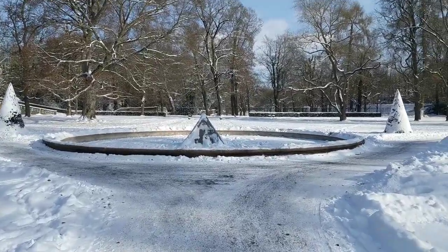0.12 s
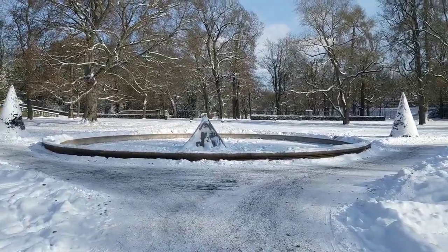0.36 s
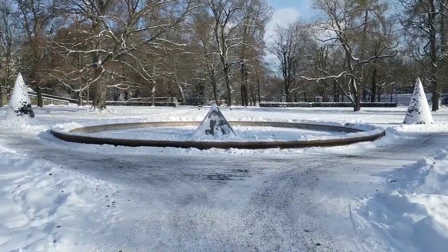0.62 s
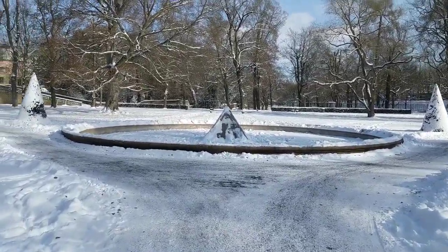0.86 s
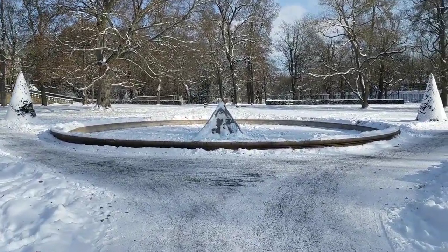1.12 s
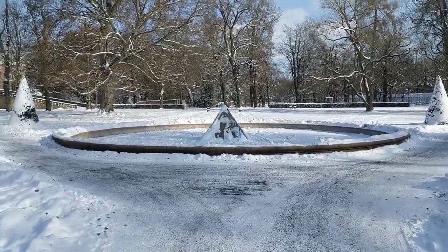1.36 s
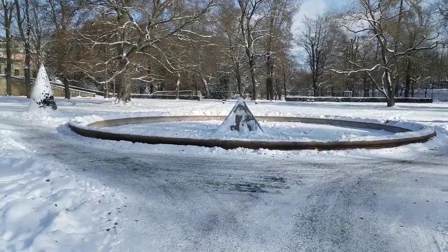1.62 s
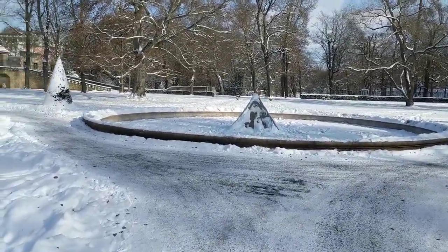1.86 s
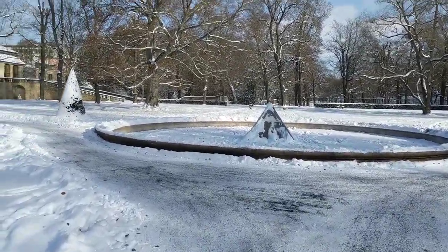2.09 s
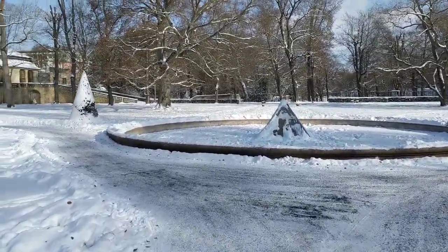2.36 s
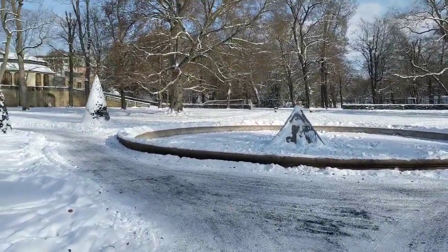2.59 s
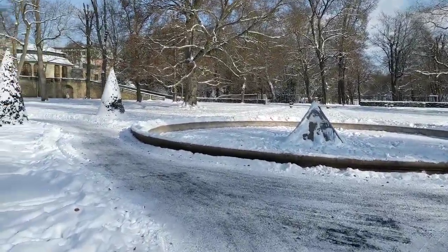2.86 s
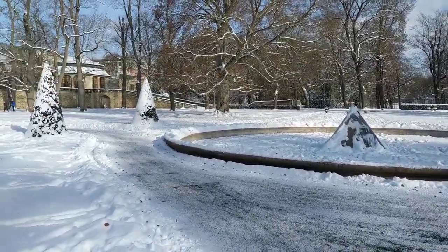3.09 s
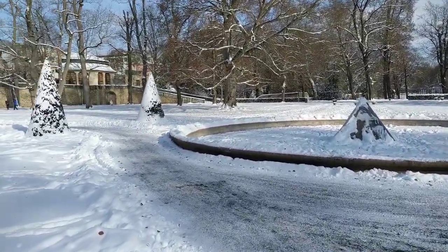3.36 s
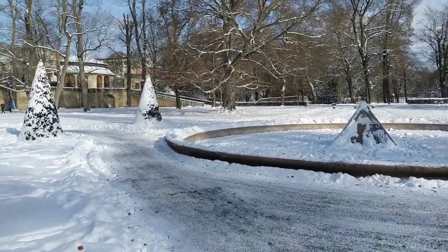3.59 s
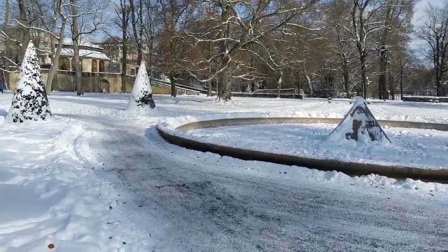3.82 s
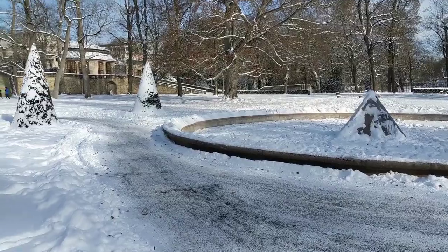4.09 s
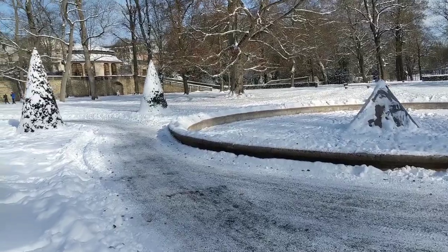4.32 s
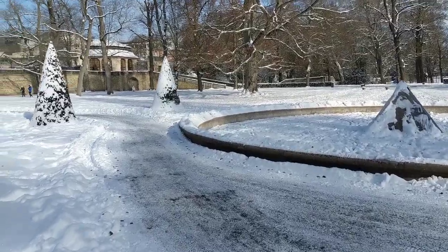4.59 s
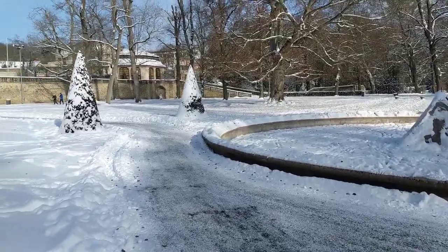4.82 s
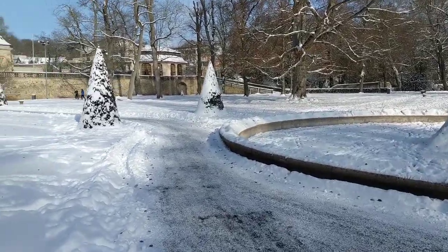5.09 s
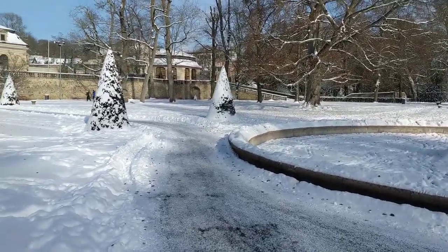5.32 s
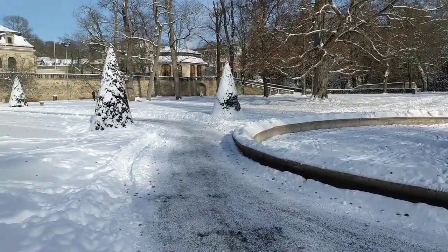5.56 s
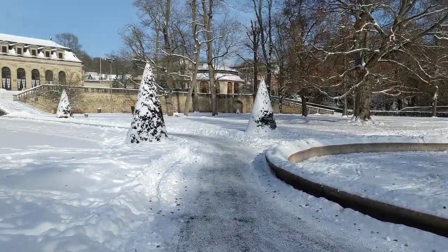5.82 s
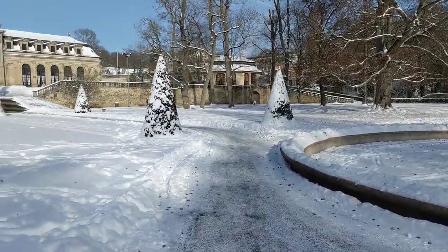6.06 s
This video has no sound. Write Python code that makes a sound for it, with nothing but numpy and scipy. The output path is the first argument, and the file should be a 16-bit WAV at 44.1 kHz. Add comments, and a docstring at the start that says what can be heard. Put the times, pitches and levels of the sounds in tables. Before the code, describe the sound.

Someone walks a snowy park path, each step a gritty crust break and duller packing crunch, while soft wind rumble comes and goes.

```python
"""Boots crunch along a trodden snow path, about two steps a second, heard from a hand-held camera.
Each heel breaks the crust with bright grit, then the weight packs the snow with a duller crunch: both are
thousands of short damped swings under step-shaped gains, with single clear cracks on top. Jacket cloth swishes
as patchy noise, wind buffets the microphone with low noise and puffs, and a far outdoor hiss lies underneath.
Soft low knocks, a metal chink and a faint whistle are the small details."""
import sys
import numpy as np
from scipy import signal
from scipy.fft import rfft, irfft, next_fast_len
from scipy.io import wavfile
from scipy.ndimage import uniform_filter1d, map_coordinates

SR = 44100
rng = np.random.default_rng(int(sys.argv[2]) if len(sys.argv) > 2 else 0)


def voltage_ratio(decibels):
    """Convert decibels (scalar or array-like) to amplitude ratios, 20 dB per decade."""
    exponent = np.asarray(decibels, float) / 20
    return 10 ** exponent


def generate_wav(sig):
    """Save sig (samples, or channels by samples) to the path in sys.argv[1] as 16-bit PCM at SR."""
    pcm = np.round(np.clip(np.atleast_2d(sig).T, -1, 1) * 32767).astype(np.int16)
    wavfile.write(sys.argv[1], SR, pcm)


N = 272979

# a heel breaks the crust: t/s, level/dB, hold/s
HEEL_STRIKES = [(0.0, -50, 0.0041), (0.395, -46.5, .02), (0.901, -49, 0.027), (1.421, -48.5, 0.027),
                (1.998, -52.5, 0.05), (2.529, -49, 0.05), (3.048, -52.5, 0.041), (3.605, -56.5, 0.018),
                (4.163, -58.5, 0.098), (4.72, -50, 0.025), (5.263, -58.5, .03), (5.797, -43.5, 0.026)]


def unit(x):
    """Scale to rms 1."""
    return x / np.sqrt(np.mean(x ** 2) + 1e-20)


def wobble(rate):
    """A smooth random curve with rate knots a second (at most 129)."""
    knots = rng.standard_normal(int(N * 130 / SR) + 4)
    return map_coordinates(knots, [np.arange(N) * min(rate, 129) / SR])


def coloured(x, spectrum):
    """Filter x by a response given as f/Hz, level/dB points joined on a log frequency axis."""
    size = next_fast_len(N + 8192)
    hz, db = np.transpose(spectrum)
    log_hz = np.log(np.fft.rfftfreq(size, 1 / SR) + 1)
    gain = voltage_ratio(np.interp(log_hz, np.log(hz), db))
    return irfft(rfft(x, size) * gain, size)[:N]


def rush(spectrum, patchy_db):
    """Coloured noise of rms 1 with patches of random gain in time and frequency."""
    z = signal.stft(rng.standard_normal(N), nperseg=512)[2]
    field = uniform_filter1d(rng.standard_normal(z.shape), size=6, axis=0)
    field = uniform_filter1d(field, size=8, axis=1)
    patchy = signal.istft(z * voltage_ratio(patchy_db * unit(field)), nperseg=512)[1][:N]
    return unit(coloured(patchy, spectrum))


def blips(s, gain, hz, cycles, turn, size, rise=0.24, fall=2.36):
    """Short damped swings around times s: a quick rounded rise, then an exponential fall."""
    k = np.arange(size) - size // 3
    phase = k / SR * hz[:, None]
    u = phase / np.maximum(cycles, .25)[:, None]  # time in units of the swing's length
    attack = np.exp(-(u / rise) ** 2)
    decay = np.exp(-fall * (np.hypot(u, 1 / 5) - 1 / 5))
    shape = np.where(u < 0, attack, decay)
    wave = -gain[:, None] * shape * np.cos(2 * np.pi * phase + turn[:, None])
    wave -= shape * (wave.sum(1) / shape.sum(1))[:, None]  # no lasting pressure change
    at = np.clip(np.round(s * SR).astype(int)[:, None] + k, 0, N)
    return np.bincount(at.ravel(), wave.ravel(), N + 1)[:N]


def grains(count, hz, spread, cycles, scatter_db, top_db, size):
    """Many swings at random moments, rms 1: log-normal pitch, a few larger than the rest up to top_db."""
    chance = rng.random((count, 3))
    pitch = np.clip(hz * np.exp(spread * rng.standard_normal(count)), 250, 15000)
    size_db = np.minimum(-scatter_db * np.log(chance[:, 1] + 1e-9), top_db)
    s = chance[:, 0] * N / SR
    turn = 2 * np.pi * chance[:, 2]
    return unit(blips(s, voltage_ratio(size_db), pitch, np.full(count, cycles), turn, size))


def swells(s, hold_s, db, rise, fall):
    """Gain of overlapping gestures: each rises to db at s, holds and dies, rise and fall in dB a second."""
    t = np.arange(0, N + 64, 64) / SR - np.asarray(s)[:, None]
    before = np.maximum(-t, 0)
    after = np.maximum(t - np.abs(hold_s)[:, None], 0)
    level_db = np.asarray(db)[:, None] - rise * before - fall * after
    gain = np.sqrt(np.sum(voltage_ratio(level_db) ** 2, axis=0))  # powers add
    return np.interp(np.arange(N) / 64, np.arange(t.shape[1]), gain)


def crust_gain():
    """A sharp burst under each heel, a trickle of grit after it, and soft scuffs as the boot swings."""
    # the swinging boot brushes the snow: t/s, level/dB
    scuffs = [(.17, -53.5), (.59, -52.5), (.985, -61.5), (1.117, -54), (1.73, -55.5), (2.327, -51.5),
              (2.66, -56), (2.78, -59), (3.41, -53.5), (3.54, -54), (3.86, -57), (4.1, -54.5), (4.5, -56),
              (4.64, -52.5), (4.95, -57.5), (5.44, -59), (6.06, -60)]
    heel_rise = 750  # dB per s
    s, db, hold_s = np.transpose(HEEL_STRIKES)
    burst = swells(s, hold_s, db, heel_rise, fall=340)
    trickle = swells(s, hold_s, db - 9, heel_rise, fall=59)
    s, db = np.transpose(scuffs)
    return burst + trickle + swells(s, 0 * s, db, rise=70, fall=45)


def packing_gains():
    """The load swells, holds and eases; a quieter roll goes on until the boot lifts."""
    # weight on the boot, then its roll: t/s, load level/dB, load hold/s, roll hold/s, roll level/dB
    weight = [(0.0, -46.5, 0.044, 0.22, -60), (0.405, -47, 0.12, .32, -54.5),
              (0.967, -42.5, 0.069, 0.29, -53.5), (1.437, -48, 0.1, 0.5, -57), (2.013, -51, 0.1, 0.37, -53),
              (2.592, -43.5, 0.021, .21, -55.5), (3.083, -53, 0.19, 0.28, -55),
              (3.64, -53, 0.076, 0.28, -52), (4.204, -42, 0.042, 0.28, -57), (4.735, -45, 0.082, .26, -56),
              (5.3, -52, 0.077, 0.2, -57), (5.835, -44.5, 0.037, 0.12, -59)]
    load_rise = 170  # dB per s
    s, db, hold_s, roll_s, roll_db = np.transpose(weight)
    load = swells(s, hold_s, db, load_rise, fall=307)
    roll = swells(s, roll_s, roll_db, load_rise, fall=330)
    return load, roll


def crunch():
    """Packing gives dense dull grains, the roll sparser snaps, the crust fine bright ones; crumbs tick along."""
    pack = grains(count=6500, hz=1250, spread=.33, cycles=1.2, scatter_db=4.6, top_db=13, size=320)
    snaps = grains(count=2200, hz=1300, spread=.36, cycles=1.3, scatter_db=5.0, top_db=15, size=320)
    crust = grains(count=9000, hz=3460, spread=0.46, cycles=0.97, scatter_db=2.5, top_db=3.5, size=96)
    crumbs = grains(count=520, hz=1870, spread=0.19, cycles=0.96, scatter_db=2.0, top_db=15.5, size=256)
    small_cracks = grains(count=170, hz=1500, spread=0.61, cycles=0.9, scatter_db=1.0, top_db=4.5, size=512)
    load, roll = packing_gains()
    clumps_db = 1.8 * wobble(95)
    uneven_db = 0.98 * wobble(17)
    steps = voltage_ratio(clumps_db + uneven_db) * (load * pack + roll * snaps + crust_gain() * crust)
    return steps + voltage_ratio(-62.5) * crumbs + voltage_ratio(-61.5) * small_cracks


def cracks():
    """Each crack is a dull swing with a bright splinter a moment before or after it."""
    # single clear cracks: t/s, body level/dB, f/Hz, length/cycles, splinter level/dB
    breaks = [(0.022, -23, 1210, .44, -39), (.061, -26, 1750, 1.4, -29), (0.1736, -24.5, 784, 0.53, -33),
              (.4118, -35, 990, 0.66, -21), (.4842, -26, 1350, .88, -36), (.554, -26, 1010, 0.69, -30),
              (0.6673, -24, 1650, 0.83, -46), (0.889, -27.5, 616, 0.65, -32), (0.935, -23, 1060, 0.62, -37),
              (0.9699, -29, 1100, 2.2, -32), (1.1273, -25, 1180, 0.46, -44), (1.253, -32.5, 1630, .89, -30),
              (1.2883, -16, 1260, 0.25, -34), (1.3333, -27, 1590, 0.73, -34), (1.3809, -40, 1230, .6, -32),
              (1.4261, -22.5, 770, 0.63, -40), (1.5976, -31, 1500, 1.9, -50),
              (1.6239, -32.5, 1700, 1.6, -55), (1.6434, -34, 1300, 1.2, -53), (1.697, -32, 1760, 1.5, -44),
              (1.9112, -31.5, 780, .65, -40), (1.968, -31, 560, 0.73, -53), (2.0195, -26.5, 666, 0.68, -36),
              (2.0754, -7, 1420, 1.13, -17.5), (2.1379, -27, 1610, 0.96, -45),
              (2.2184, -28, 1160, 0.66, -47), (2.308, -28, 1410, .74, -32), (2.337, -32, 2010, 1.8, -41),
              (2.389, -36, 1460, .65, -33), (2.566, -33, 1210, 0.53, -19), (2.798, -32, 1340, 0.78, -45),
              (3.0346, -30, 1650, 1.6, -32), (3.4296, -30, 1690, 1.4, -39), (3.607, -30, 750, 0.86, -37),
              (3.8439, -25, 1260, 0.61, -46), (3.8644, -17.5, 1010, 0.47, -49),
              (3.8771, -31, 840, .82, -47), (3.913, -18, 1040, 0.62, -51), (4.0238, -31, 630, 1.9, -70),
              (4.0682, -33, 557, 0.93, -51), (4.2368, -29, 900, 1.8, -54), (4.3622, -25.5, 960, .43, -42),
              (4.4186, -34, 1340, 1.0, -52), (4.43, -32.5, 1680, 1.8, -53), (4.6905, -28.5, 780, 0.68, -46),
              (4.7162, -22, 895, 0.87, -49), (4.7292, -23, 2000, .97, -25.5), (4.8158, -31, 1030, 2.5, -51),
              (4.9045, -33, 925, .96, -54), (4.9538, -28.5, 820, 0.8, -40), (5.0646, -24, 960, 0.71, -56),
              (5.1153, -37.5, 1300, 1.4, -54), (5.2373, -27, 1020, 0.36, -56), (5.434, -22, 860, 0.55, -31),
              (5.455, -33, 1000, 3.1, -48), (5.506, -28, 810, 0.84, -35), (5.56, -25.5, 935, 1.0, -35),
              (5.7305, -33, 1660, .8, -34), (5.7966, -27, 940, .5, -22), (5.8175, -14.5, 1260, 0.56, -24),
              (5.855, -27, 1130, 2.7, -30), (5.879, -33, 1400, 2.1, -49), (5.905, -23, 1180, 0.37, -52),
              (5.9141, -20, 1060, 0.3, -41)]
    s, db, hz, cycles, edge_db = np.transpose(breaks)
    chance = rng.standard_normal((len(s), 4))
    body = blips(s, voltage_ratio(db), hz, cycles, 0.19 * chance[:, 0], size=768)
    edge_hz = 3700 * np.exp(.1 * chance[:, 1])
    edge_s = s + .0002 * chance[:, 3]
    edge_cycles = np.full(len(s), 1.2)
    splinter = blips(edge_s, voltage_ratio(edge_db), edge_hz, edge_cycles, np.pi * chance[:, 2],
                     size=160, rise=.4, fall=2.2)
    return body + splinter


def cloth():
    """Two rubbing surfaces, moved by the same strokes: a wide airy swish and a narrower hiss."""
    # arm and leg strokes: t/s, hold/s, wide swish level/dB, narrow hiss level/dB
    strokes = [(0.202, .04, -60, -57), (.40, .02, -69, -59.5), (0.474, .13, -64, -56),
               (0.913, 0.033, -75, -59), (1.247, 0.053, -59, -54), (1.43, .02, -72, -60),
               (1.534, 0.19, -63, -57), (1.878, 0.018, -80, -59), (2.003, 0.065, -72, -61),
               (2.253, 0.15, -57, -54), (2.536, .13, -68, -56), (2.757, .04, -59.5, -55),
               (3.057, 0.025, -74, -57.5), (3.3, .05, -67, -63), (3.405, 0.036, -55, -55),
               (3.62, 0.58, -69, -61.5), (4.335, 0.056, -77, -61.5), (4.436, 0.12, -57.5, -54.5),
               (4.73, 0.19, -73, -64.5), (4.995, .02, -63, -56.5), (5.3, 0.45, -69, -62.5),
               (5.652, .04, -61, -59), (5.794, 0.048, -66, -63), (5.95, 0.17, -68, -59)]
    # cloth on cloth, relative density: f/Hz, level/dB
    wide_spectrum = [(2000, -39), (4000, -9), (7000, -3), (7800, -2), (8600, -6.5), (11000, -6),
                     (15800, -15.5)]
    # the narrower hiss, relative density: f/Hz, level/dB
    narrow_spectrum = [(2500, -19), (4000, -7.5), (5600, -2.5), (6800, -1.5), (7700, 0.5), (8500, -32),
                       (11000, -62)]
    s, hold_s, wide_db, narrow_db = np.transpose(strokes)
    wide = swells(s, hold_s, wide_db, rise=103, fall=98) * rush(wide_spectrum, patchy_db=.6)
    narrow = swells(s, hold_s, narrow_db, rise=103, fall=98) * rush(narrow_spectrum, patchy_db=.8)
    # the swish dips just before a heel lands
    depth_db, lead_s, width_s = -12, 0.01, 0.0066
    t = np.arange(N) / SR
    hush_db = sum(depth_db * np.exp(-((t - heel[0] + lead_s) / width_s) ** 2) for heel in HEEL_STRIKES)
    flutter_db = 1.7 * wobble(25)
    return voltage_ratio(flutter_db + hush_db) * (wide + narrow)


def wind():
    """Eddies over the port come in lumps, higher in pitch as the wind grows; single puffs stand out."""
    # wind strength at the microphone: t/s, level/dB
    gusts = [(0.0, -46.5), (.2, -54), (.36, -40), (.5, -53.5), (.95, -50.5), (1.06, -56.5), (1.42, -49),
             (1.68, -54.5), (1.85, -51.5), (2.17, -59), (2.3, -50), (2.64, -56), (2.82, -52), (3.17, -59),
             (3.37, -46.5), (3.7, -59.5), (4.03, -55), (4.18, -44), (4.38, -51.5), (4.52, -45),
             (4.63, -55.5), (5.06, -54.5), (5.13, -44), (5.79, -45), (5.93, -42), (6.0, -53), (6.19, -47)]
    # light wind, relative density: f/Hz, level/dB
    breeze = [(25, -22), (50, 6), (75, 2), (120, -7.5), (250, -16), (500, -59)]
    # strong wind, relative density: f/Hz, level/dB
    buffet = [(30, -26), (60, 5.5), (95, 3.5), (130, 0), (220, -10.5), (400, -25.5), (800, -53)]
    # puffs and thuds on the microphone: t/s, level/dB, f/Hz, length/cycles
    thuds = [(0.395, -23, 71, 0.2), (0.459, -34, 74, 1.3), (0.933, -33, 78.5, 0.95),
             (0.9867, -38.5, 62, 3.2), (1.555, -32, 80.0, 1.1), (2.0771, -37, 298.0, 1.5),
             (2.4849, -23.5, 240, 0.42), (2.522, -34, 215, 1.05), (2.5628, -22.5, 167.0, 0.24),
             (3.2765, -37, 92, 1.5), (3.42, -36, 87, 1.8), (4.155, -37.5, 79.0, 1.8),
             (4.194, -27, 97, 0.35), (4.2424, -29.5, 83.5, 1.06), (4.3702, -23, 188, 1.33),
             (4.8987, -31.5, 110, 0.88), (5.2117, -33.5, 92.0, 1.2), (5.3188, -19.5, 119, 0.73),
             (5.3408, -20, 126, 1.2), (5.41, -29.5, 107, 1.8), (5.455, -29.5, 115, 2),
             (5.496, -28, 116, 1.7), (5.583, -30, 90, 2.4), (5.611, -27.5, 108, 1.4),
             (5.676, -25.5, 136, 1.4), (5.7093, -29.5, 132, 1.7), (5.7931, -19.5, 111, 0.6),
             (5.852, -31, 92, 1.1), (5.8729, -26.5, 108.0, 0.56), (5.9304, -20, 109, 1.1),
             (5.948, -15, 132, 0.9), (6.062, -34.5, 120, 1.5), (6.1143, -29.5, 149, 1.3),
             (6.152, -33, 105, 1.6), (6.173, -30, 111, 1.7)]
    gust_s, gust_points_db = np.transpose(gusts)
    gust_db = np.interp(np.arange(N) / SR, gust_s, gust_points_db)
    strong = 1 / (1 + voltage_ratio(-1.2 * (gust_db + 46.5)))  # share of power in the fast eddies
    eddies = np.sqrt(strong) * rush(buffet, patchy_db=1.1)
    eddies += np.sqrt(1 - strong) * rush(breeze, patchy_db=0.2)
    lumpy = unit(voltage_ratio(1.9 * wobble(9.7)) * eddies)
    s, db, hz, cycles = np.transpose(thuds)
    turn = 1.47 * rng.standard_normal(len(s))
    puffs = blips(s, voltage_ratio(db), hz, cycles, turn, size=3000, rise=0.18, fall=2.4)
    return voltage_ratio(gust_db) * lumpy + puffs


def knocks():
    """Dull short knocks, some twenty a second, most of them faint; perhaps the hand on the camera."""
    return voltage_ratio(-61) * grains(count=130, hz=330, spread=0.29, cycles=0.84, scatter_db=3.0, top_db=11.5, size=1400)


def chink():
    """A small metal part of the clothing rings its modes at each contact, a little differently each time."""
    # contacts: t/s, level/dB
    contacts = [(3.403, -34), (3.423, -37.5), (3.555, -48)]
    # modes of the metal: f/Hz, level/dB, 60 dB decay/s
    modes = [(2110, -5, 0.034), (2680, -7, 0.06), (4230, -7, .028), (6470, 2.5, 0.03), (8100, -8, .025)]
    out = np.zeros(N)
    t = np.arange(SR // 5) / SR
    onset = 1 - np.exp(-t / 0.0015)
    for s, db in contacts:
        for hz, mode_db, t60 in modes:
            drift = .02 * np.cumsum(rng.standard_normal(len(t)))  # phase wanders, in radians
            ring = np.sin(2 * np.pi * hz * t + drift)
            level_db = db + mode_db + rng.normal(0, 2.4) - 60 * t / t60
            out[round(s * SR):][:len(t)] += voltage_ratio(level_db) * onset * ring
    return out


def chirp():
    """One faint falling whistle, a gliding sine, perhaps a far bird."""
    # path of the whistle: t/s, f/Hz, level/dB
    glide = [(6.148, 5700, -66), (6.154, 5680, -59), (6.165, 5570, -57), (6.17, 5100, -60),
             (6.176, 4870, -75)]
    s, hz, db = np.transpose(glide)
    t = np.arange(N) / SR
    sounding = (t > s[0]) & (t < s[-1])
    phase = 2 * np.pi * np.cumsum(np.interp(t, s, hz)) / SR
    return sounding * voltage_ratio(np.interp(t, s, db)) * np.sin(phase)


def air():
    """Steady outdoor air and microphone hiss: coloured noise whose level barely wavers."""
    # relative density: f/Hz, level/dB
    hiss_spectrum = [(88, -42), (150, -1), (197, 3.5), (1040, -5), (2360, -11), (3550, -15), (7320, -13),
                     (7770, -16), (8560, -22), (15100, -24), (16000, -33)]
    hiss = rush(hiss_spectrum, patchy_db=.4)
    return voltage_ratio(-53.5 + 0.11 * wobble(3.3)) * hiss


def scene():
    """Steps through the microphone's colour, then clothing, wind and air, in one channel."""
    # microphone colour for sharp sounds: f/Hz, level/dB
    mic_colour = [(200, 0.5), (5500, -3.5), (7000, 1), (7800, 1), (8600, -11), (16000, -5)]
    steps = coloured(crunch() + cracks(), mic_colour)
    return (steps + knocks() + chink() + chirp() + cloth() + wind() + air())[None]


def top_cut(x):
    """Nothing passes above the cut-off."""
    return signal.sosfilt(signal.butter(12, 16250, fs=SR, output="sos"), x)


def record(dry):
    """The camera cuts the deepest bass and tilts the rest gently down towards the treble."""
    # f/Hz, level/dB
    response = [(15, -34), (30, -19), (46, -0.5), (20000, -4.0)]
    mix = coloured(dry[0], response)[None]
    return top_cut(mix)


dry = scene()
out = record(dry)
generate_wav(out)
```